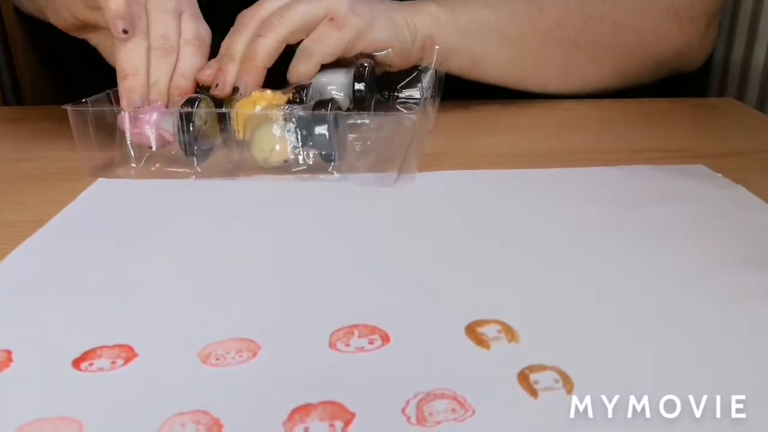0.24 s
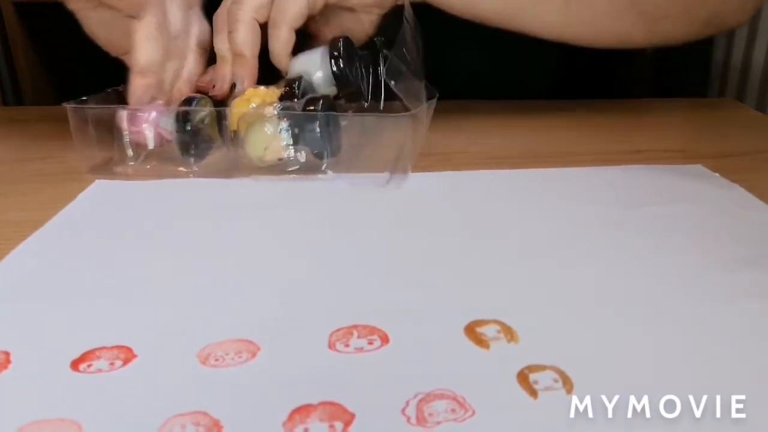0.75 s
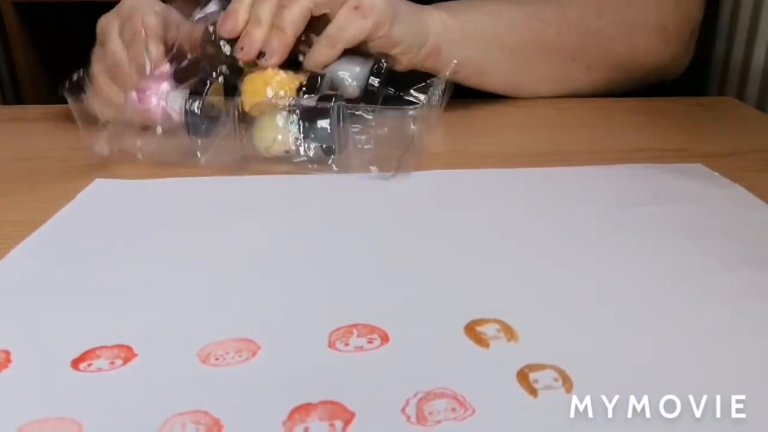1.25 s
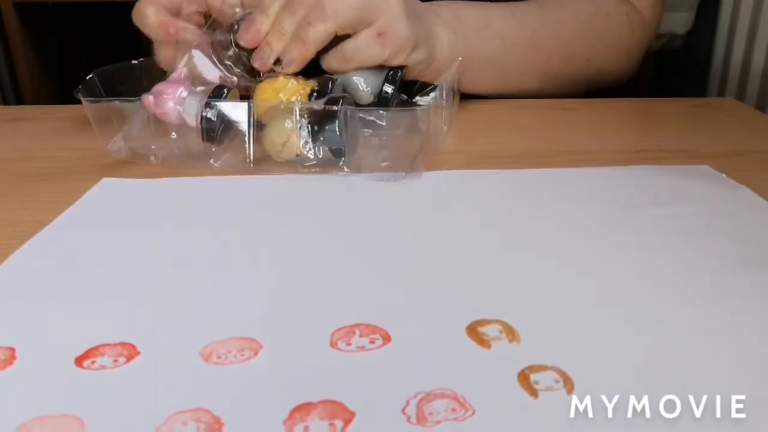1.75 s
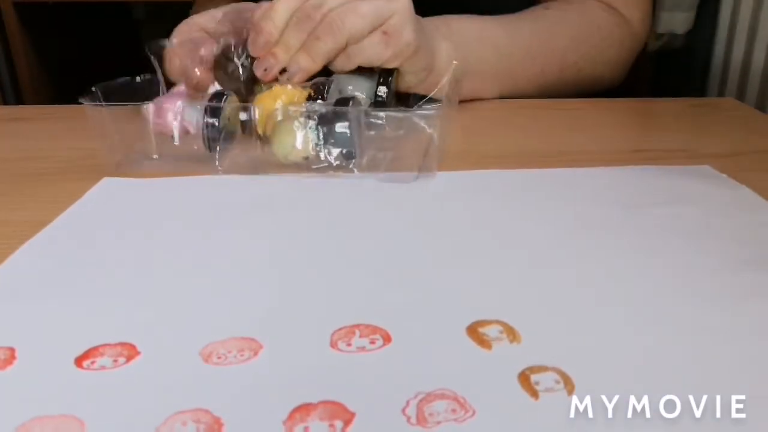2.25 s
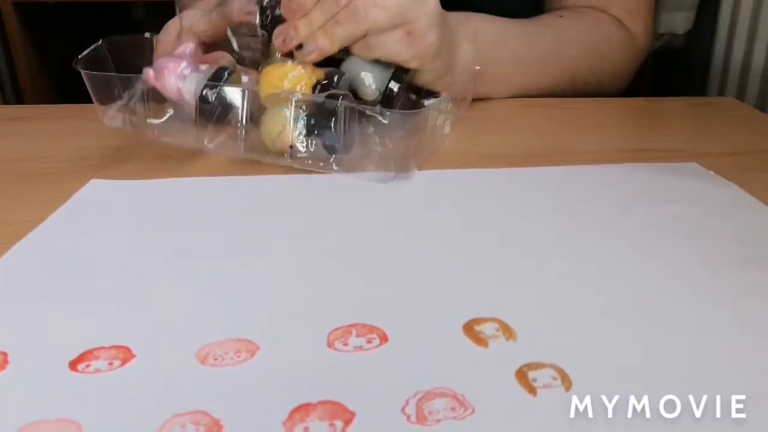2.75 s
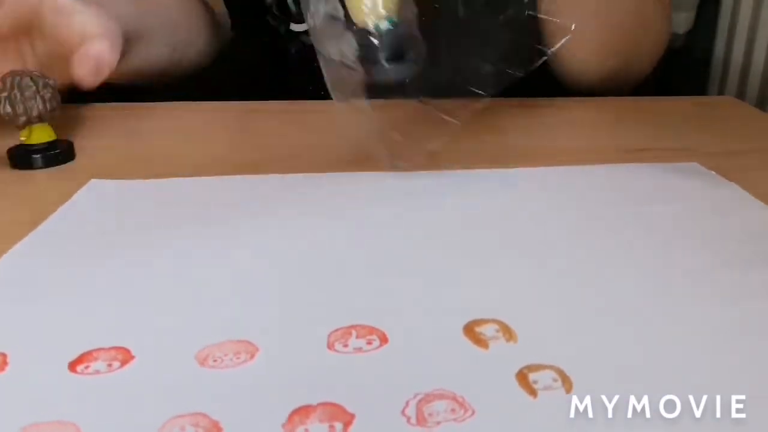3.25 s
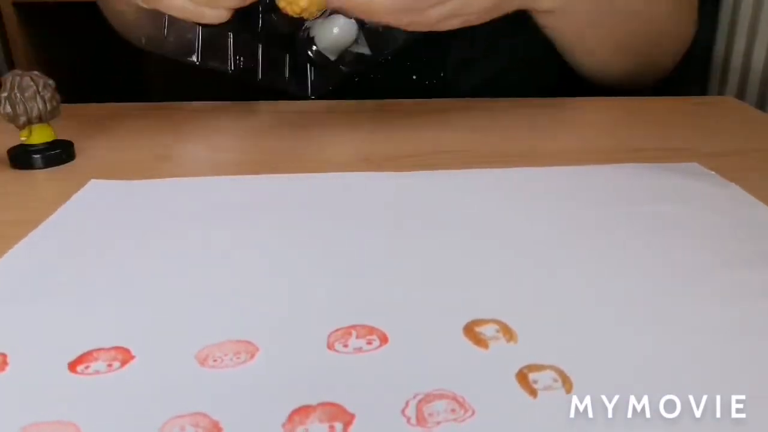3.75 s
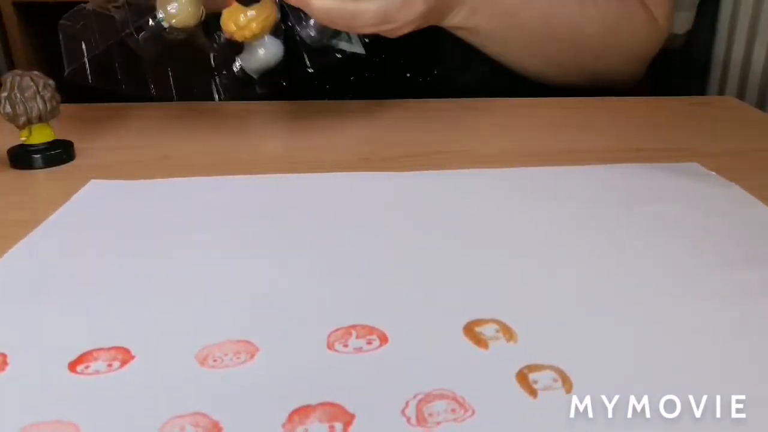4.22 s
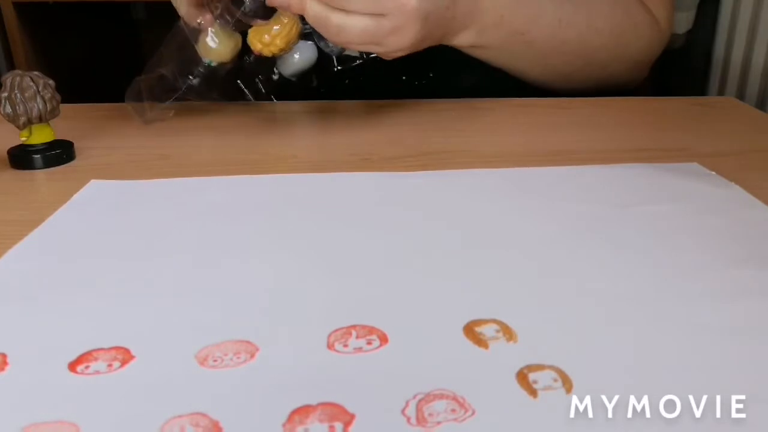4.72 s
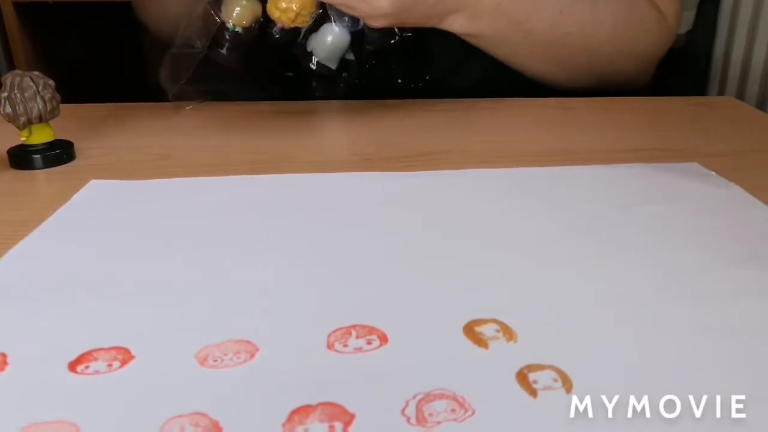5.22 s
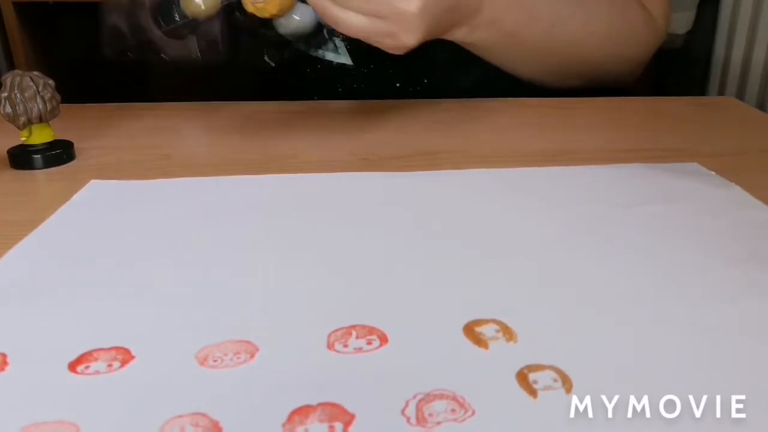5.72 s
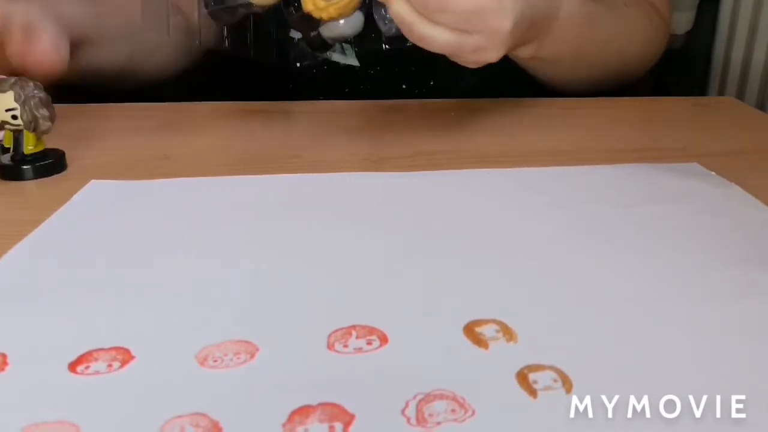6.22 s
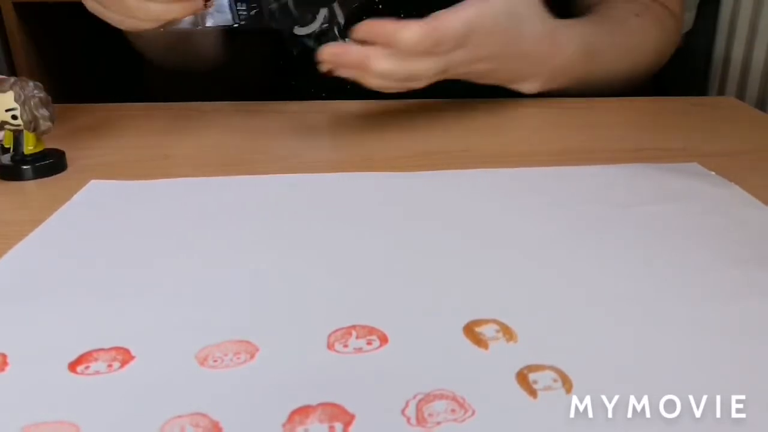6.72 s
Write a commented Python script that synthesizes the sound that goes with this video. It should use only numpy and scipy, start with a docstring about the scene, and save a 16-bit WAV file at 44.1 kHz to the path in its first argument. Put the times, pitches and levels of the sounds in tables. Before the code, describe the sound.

Thin clear plastic packaging snaps, pops and crackles sharply under pressing fingers, then crinkles more lightly in the air as a small figure taps the table.

```python
"""A small room: hands work small stamp figures out of a clear plastic blister tray on a wooden table, close by.
The thin sheet snaps as its facets flip: a pitched pop, a hollow tray recoil and a bright crease crack.
A pressing finger creaks in separate stick-slip bursts; once lifted, the tray crinkles and rustles as
shaped noise. A freed figure is stood on the table, and later nudged, with short clusters of blurred modes.
Low thuds of the hands, a diffuse noise echo and a faint steady room noise lie underneath."""
import sys
import numpy as np
from scipy import signal
from scipy.fft import rfft, irfft, next_fast_len
from scipy.io import wavfile
from scipy.ndimage import map_coordinates

SR = 44100
rng = np.random.default_rng(int(sys.argv[2]) if len(sys.argv) > 2 else 0)


def generate_wav(signal):
    """Clip the signal to [-1, 1] and save it as 16-bit WAV at the path in sys.argv[1]."""
    frames = np.transpose(np.atleast_2d(signal))
    scaled = np.clip(frames, -1, 1) * 32767
    pcm = np.round(scaled).astype(np.int16)
    wavfile.write(sys.argv[1], SR, pcm)


N = 307377  # length in samples

# Buckles of the sheet. Each row: time in seconds, pitch of the flipping facet in Hz,
# relative facet energy in dB, relative crease crack energy in dB.
SNAPS = [(0.0948, 1370, -18.5, -47), (0.1679, 1790, -2.5, -30), (0.1705, 1860, 0.5, -14),
         (0.2886, 1470, -7, -41.5), (0.3307, 2000, -14.5, -36), (0.3407, 1990, -22, -25),
         (0.3516, 1750, -3.5, -30), (0.4176, 1770, -12, -32), (0.4676, 1500, -13.5, -32.5),
         (0.694, 1890, -1.5, -11), (0.6992, 1230, -3.5, -23.5), (0.7079, 1700, -3, -16.5),
         (0.7255, 1934, -1, -11.5), (0.752, 1200, -15, -21.5), (0.9874, 1634, -3.5, -18),
         (1.058, 1512, -18.5, -42), (1.0695, 1603, -5.5, -19), (1.0819, 1360, -7, -17),
         (1.1631, 1700, -13, -24.5), (1.297, 2030, -11.5, -22), (1.3008, 847, -16.5, -31),
         (1.4791, 1054, -12.5, -36.5), (1.4941, 1530, -4.5, -10), (1.571, 1150, -17.5, -37.5),
         (1.6097, 1470, -6, -24.5), (1.6272, 2150, -13.5, -11), (1.6901, 1300, -10, -12.5),
         (1.7627, 1075, -10.5, -43), (1.8554, 1360, -6, -23.5), (1.8563, 2150, -6.5, -21.5),
         (1.8846, 2050, -13, -19.5), (1.895, 1020, -2.5, -23.5), (1.9228, 2200, -8.5, -12.5),
         (1.941, 1430, -0.5, -11.5), (2.022, 2340, -20.5, -21.5), (2.074, 1710, -14.5, -20.5),
         (2.2255, 1350, -9.5, -24.5), (2.228, 1900, -16.5, -30), (2.307, 1200, -31, -52),
         (2.342, 1183, -19.5, -40.5), (2.558, 1487, -8.5, -26), (2.6821, 1252, -12.5, -28),
         (3.0057, 1430, -16, -56.5), (3.0298, 1340, -14.5, -79), (3.044, 1060, -9.5, -29),
         (3.066, 2150, -12.5, -9.5), (3.115, 1390, -27.5, -43), (3.145, 1580, -27.5, -28),
         (3.298, 1360, -25, -35.5), (3.758, 1790, -20.5, -11), (3.813, 1600, -14.5, -17),
         (4.065, 1830, -14, -29), (4.0828, 1940, -14.5, -22.5), (4.6068, 2070, -8.5, -23.5),
         (4.6424, 2100, -9, -16.5), (4.701, 2150, -4.5, -14.5), (4.782, 1180, -16, -29),
         (4.846, 2160, -20.5, -26), (4.87, 2260, -14.5, -31), (4.8915, 2600, -32, -16),
         (4.9381, 1860, -13, -24), (4.952, 1780, -7.5, -22), (5.075, 1740, -15, -18.5),
         (5.161, 1480, -24.5, -55), (5.2304, 1690, -17, -29), (5.308, 1730, -22, -21),
         (5.3287, 2070, -11.5, -12.5), (5.665, 1830, -21.5, -25.5), (5.712, 1510, -22.5, -35),
         (5.8368, 1730, -15.5, -15.5), (5.868, 2190, -18.5, -55), (5.922, 3060, -13.5, -28.5),
         (6.401, 2090, -23, -69), (6.647, 1640, -19.5, -28), (6.7143, 1540, -20.5, -33.5),
         (6.9264, 1680, -30, -55.5)]
# The whole tray giving way with a hollow knock. Each row: time in seconds, relative energy in dB.
KNOCKS = [(0.593, -16.5), (0.754, -20), (1.0705, -8), (1.404, -27), (1.426, -24.5), (1.6891, -11.5),
          (1.941, -11), (3.234, -26.5), (3.718, -21.5), (3.81, -16), (4.0822, -16), (4.3633, -29.5),
          (4.411, -27), (5.087, -23), (5.13, -24.5), (5.2569, -15), (5.478, -24.5), (5.8363, -20),
          (5.922, -29.5), (6.075, -34.5), (6.4011, -30.5), (6.93, -29.5)]
# A finger pushing over the tray, sticking and slipping. Each row: first slip in seconds, length in seconds,
# relative level in dB, nominal slip rate in slips per second.
PUSHES = [(0.01, 0.28, -61.5, 262), (0.138, 0.037, -48.5, 88), (0.43, 0.073, -49, 154),
          (0.5531, 0.04, -48, 64.5), (0.616, 0.086, -42.5, 76.5), (0.767, 0.087, -51.5, 95),
          (0.897, 0.046, -50.5, 300), (0.955, 0.021, -46, 108), (1.0, 0.68, -63.5, 120),
          (1.192, 0.027, -51, 49), (2.369, 0.1, -50, 145), (2.469, 0.26, -52, 251),
          (2.6073, 0.027, -47, 334), (2.697, 0.091, -54.5, 78), (2.803, 0.025, -50, 290),
          (2.842, 0.086, -59.5, 260)]
# Fingers and figures sliding over the lifted tray. Each row: start in seconds, length in seconds,
# relative level in dB.
RUBS = [(3.44, 0.26, -75), (3.65, 0.047, -49), (3.96, 0.31, -61.5), (4.07, 0.031, -48), (4.365, 0.1, -62),
        (4.59, 0.41, -54), (4.768, 0.048, -46), (5.05, 0.51, -60), (5.455, 0.03, -49.5),
        (5.628, 0.052, -52), (5.99, 0.14, -66.5), (6.58, 0.13, -54)]
# An edge scraping along the sheet. Each row: start in seconds, length in seconds, relative level in dB,
# brightening in dB per octave.
SCRAPES = [(4.4763, 0.085, -38.5, 0.4), (5.253, 0.039, -41, -2.5), (5.485, 0.0033, -39.5, 2)]
# The figure meeting the table. Each row: time in seconds, relative figure energy in dB,
# relative table energy in dB.
TAPS = [(3.2548, -21.5, -14.5), (6.2299, -22, -27), (6.279, -48, -23.5)]
# Weight of the hands on tray and table. Each row: time in seconds, level in dB.
THUDS = [(0, -68), (2.3, -75.5), (6.9, -84.5)]
# Colour of the hollow tray. Each row: frequency in Hz, relative level in dB.
TRAY = [(150, -26.5), (580, 1), (1200, -9), (2500, -62)]
# Colour of a crease crack and of the skin's hiss. Each row: frequency in Hz, relative level in dB.
CRACK = [(1500, -39), (2950, 5), (6500, -3), (11000, -9), (16000, -31)]
# Colour of one finger slip. Each row: frequency in Hz, relative level in dB.
SLIP = [(250, -20.5), (700, -3), (1300, 1.5), (2300, 1.5), (3800, -24), (14000, -40)]
# Colour of rubbing and scraping. Each row: frequency in Hz, relative level in dB.
RUSTLE = [(200, -26), (600, 4.5), (1100, 3.5), (2200, -0.5), (3300, -7), (10500, -19.5), (15000, -35.5)]
# Standing resonances of the moulded sheet. Each row: frequency in Hz, relative boost in dB.
SHEET = [(660, 6), (1200, 1.5), (1400, 4.5), (2230, 3)]
# Modes of the struck figure. Each row: centre frequency in Hz, typical relative level in dB, t60 in seconds.
FIGURE = [(2040, 2, 0.025), (2498, -10, 0.052), (5400, -10, 0.11), (8953, -6.5, 0.035)]
# Modes of the table top. Each row: centre frequency in Hz, typical relative level in dB, t60 in seconds.
TABLE = [(237, 1.1, 0.1), (434, 9.4, 0.04), (655, 3.8, 0.06)]
# Late decay of the room. Each row: frequency in Hz, t60 in seconds.
ROOM = [(300, 0.3), (5000, 0.35), (14000, 0.15)]
# Colour of the steady room noise. Each row: frequency in Hz, relative level in dB.
QUIET = [(30, -17.5), (1500, -14), (14000, -30.5)]

TOP_HZ = 15500  # nothing sounds above this
SIZE = 8192  # samples in one impulse
HZ = np.fft.rfftfreq(SIZE, 1 / SR) + 1
AGE = np.arange(SIZE) / SR  # seconds since the impulse
TIME = np.arange(N) / SR  # seconds
LIFT_S = 3.05  # the tray leaves the table
HELD_T60_S, LIFTED_T60_S = 0.018, 0.049  # damped against the table, ringing on in the air
# recoil grows in dB per dB of facet energy, and weakens for facets pitched above FACET_HZ
RECOIL_DB, RECOIL_GROWS, RECOIL_DB_PER_OCTAVE, FACET_HZ = -15.5, 0.57, -10.5, 1650
PUSH_RISE_DB_PER_S, PUSH_FALL_DB_PER_S = 400, 444
RUB_RISE_DB_PER_S, RUB_FALL_DB_PER_S = 792, 392
SCRAPE_RISE_DB_PER_S, SCRAPE_FALL_DB_PER_S = 8000, 616
SLIP_JITTER, SLIP_SCATTER_DB, SLIP_SWELL_DB = 0.18, 2.6, 7
# slip colour tilts about SLIP_HZ, down by this much an octave for each doubling of the rate over SLIP_RATE
SLIP_HZ, SLIP_RATE, SLIP_DULLING_DB = 1600, 190, 1
SHEET_WIDTH_OCTAVES = 0.034
HELD_ROOM_DB, LIFTED_ROOM_DB = -11.5, -9.5  # the lifted tray sounds roomier
CRACK_ROOM_DB, CREAK_ROOM_DB = -4.5, -14


def snaps():
    """A facet flips, the whole tray recoils and the crease cracks; returns (body, crack)."""
    body, crack = np.zeros(N), np.zeros(N)
    for s, hz, facet_db, crack_db in SNAPS:
        grip_db = 3.17 * ripple(spacing_hz=160.2)
        pop_colour_db = facet(hz, below_db=26, above_db=29, skirt_db=-39.0) + grip_db
        pop = burst(pop_colour_db, ring_db=-4.5, t60=sheet_t60(s))
        # a strong flip, or a large low facet, shakes the tray more
        size_db = RECOIL_DB_PER_OCTAVE * np.log2(hz / FACET_HZ)
        tray_db = RECOIL_DB + RECOIL_GROWS * facet_db + size_db
        add(body, s, amp(facet_db + 2.5) * pop + amp(tray_db) * recoil(s, grip_db))
        crease = burst(along(CRACK, HZ), ring_db=9.5, t60=0.013)
        add(crack, s, amp(crack_db + 0.68) * crease)
    return body, crack


def facet(hz, below_db, above_db, skirt_db):
    """A facet's rounded resonance, falling by so many dB an octave below and above its pitch."""
    octaves = np.log2(HZ / hz)
    away = np.hypot(octaves, 0.42) - 0.42
    peak = -away * np.where(octaves < 0, below_db, above_db)
    overtones = skirt_db - np.abs(octaves) * 10 - (HZ / 9000) ** 5  # the very top falls away softly
    return np.logaddexp(peak, overtones)


def recoil(s, grip_db):
    """The hollow ring of the whole tray, outlasting a single facet; energy 1."""
    return burst(along(TRAY, HZ) + grip_db, ring_db=-2.5, t60=1.34 * sheet_t60(s))


def sheet_t60(s):
    """Ring time of the sheet at time s: short on the table, longer in the air."""
    return LIFTED_T60_S if s > LIFT_S else HELD_T60_S


def burst(colour_db, ring_db, t60):
    """One sudden release, then its bending waves scattered about the sheet; energy 1."""
    release = causal(colour_db)
    scatter = through(rng.standard_normal(SIZE) * fade(AGE, t60), release)
    return unit_energy(unit_energy(release) + amp(ring_db) * unit_energy(scatter))


def ripple(spacing_hz):
    """Random peaks and dips in dB: every grip gives the sheet other resonances."""
    return map_coordinates(rng.standard_normal(SIZE // 8), [HZ / spacing_hz], mode="wrap")


def knocks():
    """The whole tray gives at once under the hands."""
    sound = np.zeros(N)
    for s, db in KNOCKS:
        add(sound, s, amp(db + 5.5) * recoil(s, 4 * ripple(spacing_hz=176)))
    return sound


def creak(level_db, count=120):
    """The finger sticks and slips unevenly: a ratchet when slow, a duller rasp when fast."""
    sound = np.zeros(N)
    for s, length, db, rate in PUSHES:
        tilt_octaves = np.clip(np.log2(HZ / SLIP_HZ), -1, 1)
        spot_db = along(SLIP, HZ) - SLIP_DULLING_DB * np.log2(rate / SLIP_RATE) * tilt_octaves
        first_db, last_db = [2.2 * ripple(spacing_hz=400) for _ in range(2)]
        gap, size = rng.standard_normal((2, count))
        stuck = np.exp(SLIP_JITTER * gap)  # the longer it sticks, the harder it slips
        ages = (np.cumsum(stuck) - stuck[0]) / rate
        # each push swells and eases while its colour wanders
        progress = np.pi * (ages + 0.5 / rate) / (length + 1 / rate)
        swell_db = SLIP_SWELL_DB * (np.sin(progress) - 2 / np.pi)
        slip_db = db + swell_db + SLIP_SCATTER_DB * size
        for k in np.flatnonzero(ages <= length):
            wander_db = first_db * np.cos(progress[k]) + last_db * np.sin(progress[k])
            colour_db = spot_db + wander_db + 2 * ripple(spacing_hz=700)
            slip = burst(colour_db, ring_db=-8, t60=0.014)
            density = np.sqrt(SR / rate)  # sparse slips are stronger, so the rate keeps the level
            add(sound, s + ages[k], amp(slip_db[k]) * stuck[k] * density * slip)
    # between slips the skin still hisses over the plastic
    hiss = unit(through(rng.standard_normal(N), causal(along(CRACK, HZ))))
    return sound + amp(level_db - 19) * hiss


def pressing():
    """Level in dB of the pushing finger, the strongest push at each moment."""
    return strokes(PUSHES, PUSH_RISE_DB_PER_S, PUSH_FALL_DB_PER_S).max(0)


def crinkles(level_db, count=100):
    """Small buckles under the moving fingers: dull bumps in a light grip, bright ticks in a firm one."""
    sound = np.zeros(N)
    slots = (np.arange(count) + rng.random(count)) / count
    moments = LIFT_S + slots * (N / SR - LIFT_S)
    for s, chance in zip(moments, rng.uniform(-1.85, 1, count)):
        grip_db = level_db[int(s * SR)]
        bump = burst(along(TRAY, HZ) + 4 * ripple(spacing_hz=160), ring_db=2.5, t60=0.045)
        tick = flick(2600, ring_db=-2.0)
        add(sound, s, amp(0.52 * grip_db + 3.5 + 2.0 * chance) * bump)
        add(sound, s, amp(grip_db + 25.5 + 4.7 * chance) * tick)
    return sound


def flick(hz, ring_db):
    """A tiny sudden release, its pitch scattered about hz; energy 1."""
    pitch_hz = hz * amp(1.5 * rng.standard_normal())
    colour_db = facet(pitch_hz, below_db=14, above_db=36, skirt_db=-16)
    return burst(colour_db + 2 * ripple(spacing_hz=300), ring_db=ring_db, t60=0.015)


def rustle(level_db):
    """Skin and figures slide over the sheet: grainy noise whose resonances shift with the grip."""
    sound = np.zeros(N)
    for _ in range(4):  # four colours drift in and out
        grains = rng.standard_normal(N) * amp(9.2 * wobble(700))
        colour = causal(along(RUSTLE, HZ) + 3 * ripple(spacing_hz=172))
        sound += unit(through(grains, colour)) * amp(4.4 * wobble(35))
    # a light touch sounds dull, a firm stroke hisses
    lowpass = signal.butter(2, 2700, fs=SR, output="sos")
    dull = signal.sosfiltfilt(lowpass, sound)
    sound = dull + amp(0.091 * (level_db + 46.5)) * (sound - dull)
    return amp(level_db - 1) * unit(sound)


def rubbing():
    """Level in dB of the sliding contact with the lifted tray."""
    return strokes(RUBS, RUB_RISE_DB_PER_S, RUB_FALL_DB_PER_S).max(0)


def scrapes():
    """An edge catches at once and sheds a dense stream of tiny cracks, made as grainy noise."""
    sound = np.zeros(N)
    levels_db = strokes(SCRAPES, SCRAPE_RISE_DB_PER_S, SCRAPE_FALL_DB_PER_S)
    for level_db, (*_, tilt_db) in zip(levels_db, SCRAPES):
        grains = rng.standard_normal(N) * amp(3.9 * wobble(900))
        colour_db = along(RUSTLE, HZ) + tilt_db * np.log2(HZ) + 2 * ripple(spacing_hz=284.7)
        sound += amp(level_db) * unit(through(grains, causal(colour_db)))
    return sound


def sheet(x):
    """Whatever bends the sheet also rings its standing resonances."""
    boost_db = sum(db * np.exp(-(np.log2(HZ / hz) / SHEET_WIDTH_OCTAVES) ** 2) for hz, db in SHEET)
    return through(x, causal(boost_db - 0.26))


def taps():
    """The hard base of the figure clicks and the table top knocks."""
    sound = np.zeros(N)
    for s, figure_db, table_db in TAPS:
        click = 0.55 * flick(3500, ring_db=3)
        figure = ring(FIGURE) + click
        add(sound, s, amp(figure_db) * figure + amp(table_db) * ring(TABLE))
    return through(sound, causal(-(HZ / 8500) ** 5))  # the taps stay soft at the very top


def ring(modes):
    """A struck object's decaying modes, blurred into narrow bands of noise; energy 1."""
    sound = np.zeros(SIZE)
    for hz, db, t60 in modes:
        blurred_hz = hz * (1 + 0.21 * rng.standard_normal(SIZE))
        phase = 2 * np.pi * np.cumsum(blurred_hz) / SR
        sound += amp(db + rng.normal(0, 0.77)) * np.cos(phase) * fade(AGE, t60)
    return unit_energy(sound)


def whisk():
    """Fingers brush off the figure that they have stood down: a short, very high whisk of noise."""
    stroke = np.exp(-((TIME - 3.386) / 0.012) ** 2)
    hiss = through(rng.standard_normal(N), causal(-np.abs(np.log2(HZ / 10500)) * 24))
    return amp(-63.5) * stroke * unit(hiss)


def handling():
    """Working hands shift their weight on tray and table: soft, uneven low thuds of noise."""
    colour_db = -np.abs(np.log2(HZ / 120)) * 3 - (HZ / 95) ** 2
    thuds = through(rng.standard_normal(N), causal(colour_db))
    level_db = np.interp(TIME, *np.transpose(THUDS))
    return amp(level_db) * unit(thuds * amp(6 * wobble(16)))


def room(x):
    """Table and walls answer with a diffuse tail: the energy in each band lingers as noise."""
    hz, t, z = signal.stft(x, SR, nperseg=256)
    age = t[t < 0.5]
    tail = fade(age, along(ROOM, hz)[:, None])
    # near surfaces answer first
    tail = tail * (1 + 4.2 * fade(age, 0.14)) * (1 - np.exp(-(age / 0.0018) ** 2))
    linger = tail ** 2 / np.sum(tail ** 2, axis=1, keepdims=True)
    energy = np.abs(signal.fftconvolve(np.abs(z) ** 2, linger, axes=1))[:, :len(t)]
    noise = signal.stft(rng.standard_normal(N), SR, nperseg=256)[2]
    echo = noise * np.sqrt(energy / np.mean(np.abs(noise) ** 2))
    return signal.istft(echo, SR, nperseg=256)[1][:N]


def room_tone():
    """The faint steady noise of the room."""
    return amp(-84) * unit(through(rng.standard_normal(N), causal(along(QUIET, HZ))))


def strokes(rows, rise, fall):
    """Level in dB of each stroke, one line per row: it swells, holds and dies away, in dB per second."""
    return np.array([db - rise * np.maximum(s - TIME, 0) - fall * np.maximum(TIME - s - length, 0)
                     for s, length, db, *_ in rows])


def amp(db):
    """Decibels to gain."""
    return 10 ** (np.asarray(db) / 20)


def unit(x):
    """Scale to rms 1."""
    return x / np.sqrt(np.mean(x ** 2) + 1e-20)


def unit_energy(x):
    """Scale to energy 1."""
    return x / (np.linalg.norm(x) + 1e-20)


def along(points, hz):
    """Read a curve of (Hz, value) points on a log frequency axis."""
    f, v = np.transpose(points)
    return np.interp(np.log(hz + 1), np.log(f), v)


def fade(t, t60):
    """Exponential decay, down 60 dB after t60 seconds."""
    return np.exp(-np.log(1000) * t / t60)


def wobble(rate):
    """A smooth random curve, rate knots a second."""
    return map_coordinates(rng.standard_normal(SIZE), [TIME * rate], mode="wrap")


def causal(db):
    """The quickest (minimum-phase) impulse response with these gains on the HZ grid."""
    cepstrum = irfft(np.log(amp(db) + 1e-6))
    cepstrum[1:SIZE // 2] *= 2
    cepstrum[SIZE // 2 + 1:] = 0
    return irfft(np.exp(rfft(cepstrum)))


def through(x, response):
    """x convolved with an impulse response, kept to its own length."""
    return signal.fftconvolve(x, response)[:len(x)]


def add(track, s, sound):
    """Mix a sound in at time s."""
    part = track[max(round(s * SR), 0):][:len(sound)]
    part += sound[:len(part)]


def scene():
    """Tray and figure close by; the cracks spray into the room more than the low pops and the creak do."""
    press_db, rub_db = pressing(), rubbing()
    body, crack = snaps()
    slips = sheet(creak(press_db))
    tray = sheet(body + knocks() + rustle(rub_db) + scrapes() + crinkles(rub_db))
    near = tray + taps() + whisk()
    room_db = np.where(TIME > LIFT_S, LIFTED_ROOM_DB, HELD_ROOM_DB)
    echo = room(amp(room_db) * near + amp(CRACK_ROOM_DB) * crack + amp(CREAK_ROOM_DB) * slips)
    return (near + slips + crack + echo + handling() + room_tone())[None]


def record(dry):
    """A steep band limit removes everything from TOP_HZ upwards."""
    size = next_fast_len(N + SIZE)
    kept = np.fft.rfftfreq(size, 1 / SR) < TOP_HZ
    return irfft(rfft(dry, size) * kept, size)[:, :N]


dry = scene()
out = record(dry)
generate_wav(out)
```